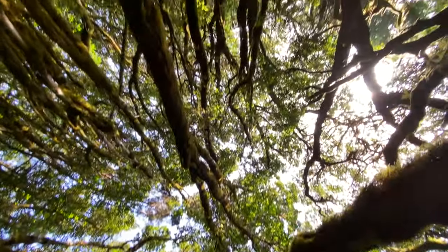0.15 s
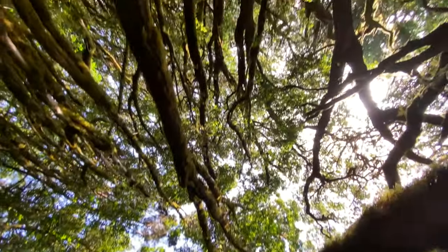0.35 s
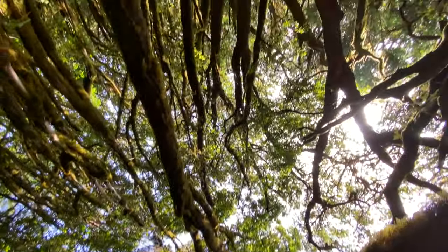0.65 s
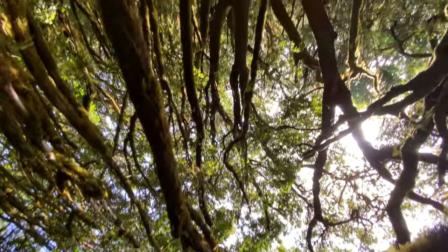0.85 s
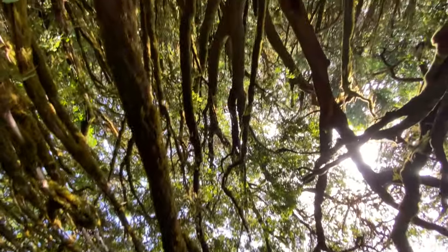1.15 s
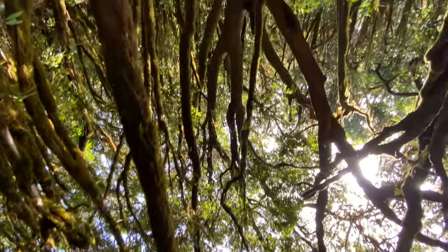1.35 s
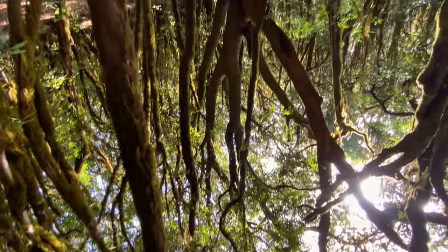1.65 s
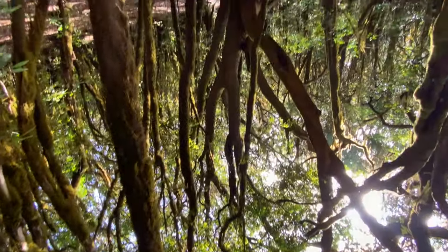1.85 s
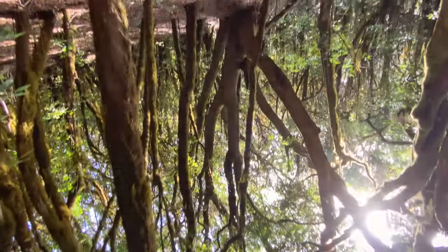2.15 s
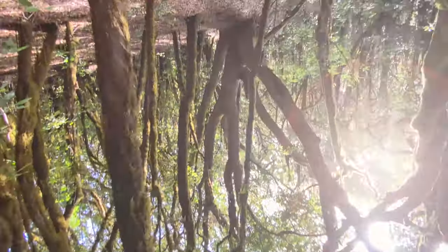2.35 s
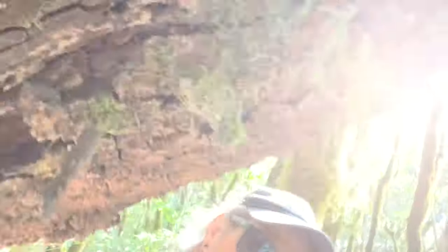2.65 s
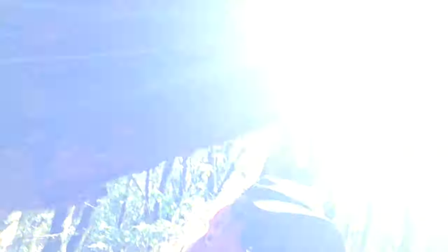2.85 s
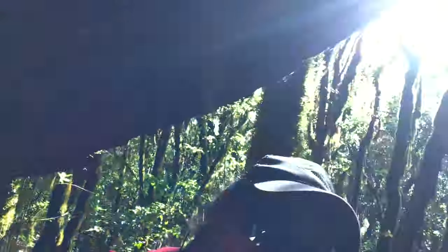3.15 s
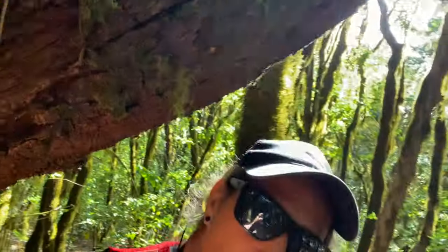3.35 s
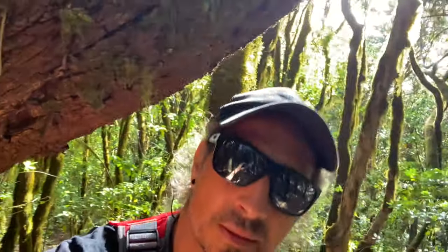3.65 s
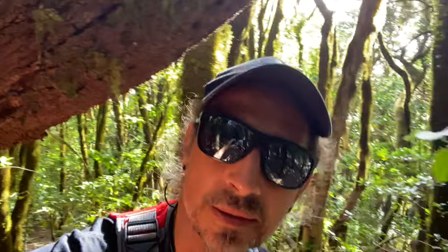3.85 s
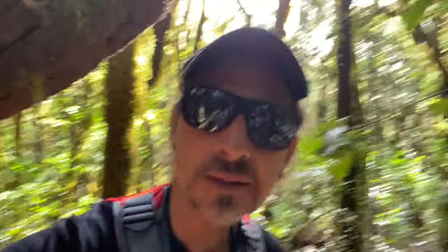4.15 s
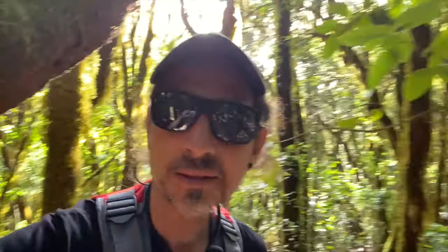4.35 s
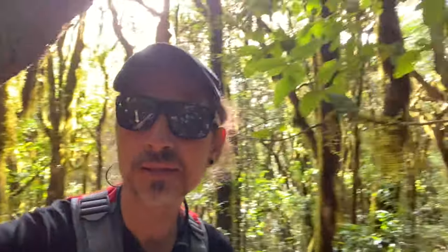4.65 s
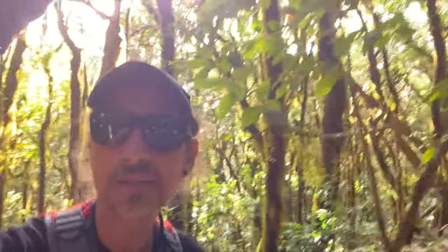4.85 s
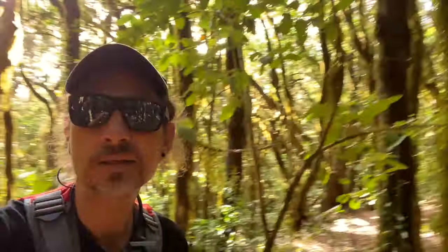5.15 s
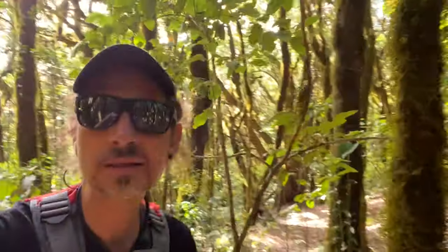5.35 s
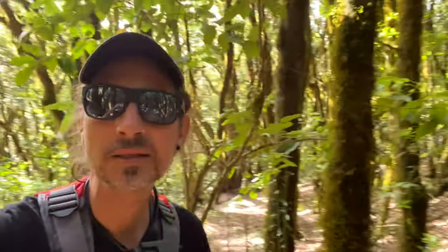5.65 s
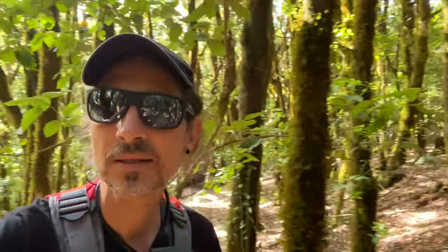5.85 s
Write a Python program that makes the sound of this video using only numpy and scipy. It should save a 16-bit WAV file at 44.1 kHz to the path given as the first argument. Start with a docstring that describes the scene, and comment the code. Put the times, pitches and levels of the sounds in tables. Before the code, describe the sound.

A very quiet forest with only faint air and a few tiny ticks for two seconds, then a walker steps into dry leaves. Irregular crunches, crinkling and sharp twig snaps follow, densest from about three to four seconds, with a firm dull thump near four. Sparser steps and rustling continue to the end. Close hand-held stereo microphones, dry outdoors, slight handling rumble.

```python
"""A still forest, two close microphones on a hand-held recorder: faint air, a few ticks, handling rumble.
Just before 2 s the walker first touches the litter; then leaves rustle and are trodden unevenly to the end.
Each press is a swarm of tiny noise bursts for breaking leaves, over a hiss where they only slide. Stalks and
twigs snap singly, as cracks with a short ring. Damped noise gives low thumps: soil under the foot, and wind or
handling on the microphones near 1.9 and 5.9 s. The legs and pack return a close echo; the foot's bearing sets
arrival time and level at each microphone."""
import sys
import numpy as np
from scipy import signal
from scipy.fft import rfft, irfft
from scipy.io import wavfile
from scipy.ndimage import uniform_filter1d, map_coordinates

SR = 44100
rng = np.random.default_rng(int(sys.argv[2]) if len(sys.argv) > 2 else 0)


def unload_audio(sound):
    """Save the sound as a 16-bit wav file, at the path given as the first command line argument."""
    columns = np.transpose(np.atleast_2d(sound))
    # keep every value between -1 and 1, then stretch to whole-number steps
    steps = np.round(np.clip(columns, -1, 1) * 32767)
    wavfile.write(sys.argv[1], SR, steps.astype(np.int16))


N = 264600
TIME = np.arange(N) / SR


def from_db(db):
    """Decibels to amplitude gain."""
    return np.exp(np.asarray(db) * (np.log(10) / 20))


def rms_one(x):
    """Scale to unit rms."""
    return x / np.sqrt(np.mean(x ** 2) + 1e-20)


def peak_one(x):
    """Scale to unit peak."""
    return x / (np.abs(x).max() + 1e-20)


def in_time(rows):
    """Join the rows of a table by straight lines: each column at every sample."""
    seconds, *columns = np.transpose(rows)
    return [np.interp(TIME, seconds, column) for column in columns]


def at_hz(points, hz):
    """Read a curve over frequency on a logarithmic axis."""
    point_hz, value = np.transpose(points)
    return np.interp(np.log(hz), np.log(point_hz), value)


def spectrum_hz():
    """Frequencies of a whole-length spectrum, with 1 Hz in place of zero."""
    return np.maximum(np.fft.rfftfreq(N, 1 / SR), 1)


def band(x, low, high, order=2):
    """Butterworth band-pass between two frequencies in Hz."""
    high = min(high, .47 * SR)
    low = min(low, high / 1.05)
    return signal.sosfilt(signal.butter(order, [low, high], "band", fs=SR, output="sos"), x)


def add(track, s, sound):
    """Mix a short sound in at s seconds."""
    i = int(np.clip(s * SR, 0, N - 1))
    track[..., i:i + sound.shape[-1]] += sound[..., :N - i]


def pair(white, alike):
    """Mix two noises into a left and right of given likeness, 0-1."""
    alike = np.clip(alike, 0, 1)
    shared = np.sqrt((1 + alike) / 2) * white[0]
    opposed = np.sqrt((1 - alike) / 2) * white[1]
    return shared + opposed * [[1], [-1]]


def drift(per_s):
    """Smooth chance with a spread of 1, changing about per_s times a second."""
    knots = rng.standard_normal(size=600)
    return rms_one(np.interp(TIME * per_s, np.arange(len(knots)), knots))


def delayed(x, ms):
    """Read a sound ms milliseconds late; ms may change with time."""
    return map_coordinates(x, [np.arange(N) - ms * SR / 1000], order=2, mode="nearest")


def air_noise(spectrum, alike):
    """Steady stereo noise of a given colour, rms 1."""
    white = pair(rng.standard_normal((2, N)), alike)
    return rms_one(irfft(rfft(white) * from_db(at_hz(spectrum, spectrum_hz())), N))


# Colour of the forest air around the recorder. Each row: frequency in Hz, relative density in dB per Hz.
FOREST_COLOUR = [(30, -25), (44, -15), (59, 5), (78, -12), (125, -11), (240, -15.5), (450, -24), (800, -28),
                 (1600, -25), (2800, -28), (4300, -25.5), (7600, -30.5), (8400, -24.5), (11500, -47),
                 (15000, -75)]
FOREST_DB = -60.2   # rms before the side-to-side tilt


def forest_air():
    """The quiet place itself: steady coloured noise, stronger at the right microphone."""
    return from_db(FOREST_DB) * air_noise(FOREST_COLOUR, alike=0.28) * from_db([[-1.8], [1.8]])


# Colour of the hand on the recorder. Each row: frequency in Hz, relative density in dB per Hz.
RUMBLE_COLOUR = [(20, -36), (36, -8), (50, -7), (75, -2.5), (120, -10), (250, -21), (1000, -28),
                 (8000, -100)]
# The hand shifts. Each row: time of greatest height in s, level in dB, half-length (power down to 1/e) in s.
HAND_SHIFTS = [(1.5, -64.5, .55), (1.93, -50.5, .05), (2.7, -61, .7), (3.03, -49.5, .075), (4.1, -60, .22),
               (4.87, -59.5, .08), (5.46, -50, .035), (5.95, -46.5, .055)]


def handling():
    """The hand shifts on the recorder: each time a bell-shaped swell of low rumble."""
    power = np.zeros(N)
    for s, db, half_s in HAND_SHIFTS:
        power += from_db(db) ** 2 * np.exp(-((TIME - s) / half_s) ** 2)
    return np.sqrt(power) * air_noise(RUMBLE_COLOUR, alike=0.69)


# Faint ticks and the first touches of the foot.
# Each row: start in s, peak in dB before the common lift, pitch in Hz, band half-width relative to pitch.
TICKS = [(.075, -48, 1990, 1), (.108, -42.5, 3800, 0.13), (.455, -51, 2000, .9), (.47, -46.5, 8200, .15),
         (.605, -46, 7900, 0.095), (0.829, -39.5, 8400, 0.062), (1.074, -32, 8360, 0.037),
         (1.096, -44, 8150, 0.1), (1.852, -44, 2380, 0.8), (1.876, -40.5, 1490, 1.2),
         (1.905, -43, 2200, .8), (1.9365, -30, 8700, 0.056), (1.938, -32, 2490, 1), (1.946, -38, 4400, .3),
         (1.976, -42, 8100, 0.093)]


def ticks(level_db, fade_s, tail_db, tail_s):
    """Small light ticks: short noise bursts with a weaker, longer scatter from the trunks."""
    out, t = np.zeros((2, N)), TIME[:SR // 8]
    fade = np.exp(-t / fade_s) + from_db(tail_db) * np.exp(-t / tail_s)
    for s, db, hz, width in TICKS:
        burst = pair(rng.standard_normal((2, len(t))), 0.26) * fade
        tick = peak_one(band(burst, hz / (1 + width), hz * (1 + width)))
        add(out, s, from_db(db + level_db) * tick)
    return out


# Low thumps: soil under the foot, and wind or handling on the microphones near 1.9 and 5.9 s.
# Each row: start in s, peak in dB before the bearing, pitch in Hz, 60 dB decay of the push in s.
THUMPS = [(1.877, -41, 130, 0.085), (1.915, -40, 50, 0.2), (2.935, -30.5, 338, .06),
          (2.995, -35, 232, 0.096), (3.908, -24, 700, 0.036), (3.926, -17.5, 735, 0.027),
          (3.928, -22.5, 375, 0.04), (4.02, -22.5, 800, .16), (4.185, -39, 244, 0.038),
          (4.29, -44, 139, 0.091), (5.875, -34.5, 51, 0.37)]


def thumps(width):
    """A push on soft ground or on the microphones: a dull, quickly damped burst of noise around one pitch."""
    out, t = np.zeros(N), TIME[:SR // 4]
    for s, db, hz, t60 in THUMPS:
        push = rng.standard_normal(len(t)) * from_db(-60 * t / t60)
        add(out, s, from_db(db) * peak_one(band(push, hz / (1 + width), hz * (1 + width))))
    return out


def press_envelope(s, attack_s, hold_s, release_s):
    """The foot loads the leaves, stays, and they settle."""
    t = TIME - s
    settling = np.maximum(t - attack_s - hold_s, 0)
    return np.clip(t / attack_s, 0, 1) * from_db(-20 * settling / release_s)


# A heel or sole presses or drags through the leaves. Each row: start in s, attack in s, hold in s,
# release to -20 dB in s, relative crunch in dB, relative weight on the soil in dB,
# crispness against crunch in dB, share that is fracture rather than sliding 0-1.
PRESSES = [(2.525, .02, .015, .1, -28, 2, -1, .5), (2.59, .015, .04, .08, -34, 2, -6, .3),
           (2.806, .018, .09, .15, -23.8, -5, -.5, .3), (2.85, .04, .06, .11, -27.5, 8, -8, .25),
           (2.975, .015, .025, .16, -26.5, 6, 1.5, .5), (3.1, .05, .055, .06, -32, 8.5, 1, .7),
           (3.885, .018, .02, .14, -19.7, 0.5, .5, .6), (3.995, .015, .03, .22, -26, 6, 3, .75),
           (4.06, .015, .012, .07, -30, -2, 3, .7), (4.804, .008, .016, .19, -23, -3, -3, .55),
           (5.22, .05, .08, .13, -30.8, -1.5, -3.5, .02), (5.838, .025, .045, .12, -24.5, -6, 0, .5),
           (5.975, .015, .025, .12, -29, -7, -1, .5)]
PRESS_SOIL_DB, PRESS_CRUMPLE_DB = -18, -11   # pressing and crumpling against crunch, at zero weight
CRUMPLE_PER_WEIGHT = .55   # share of the weight's dB that reaches the crumpling
# Litter that keeps rustling as the walker's weight shifts.
# Each row: time in s, relative crunch in dB, crispness against crunch in dB.
RUSTLE = [(2.0, -67, 2), (2.08, -54, 5), (2.19, -57, 4), (2.36, -38, 5.5), (2.66, -39, 0), (2.79, -49, -1),
          (3.18, -29.5, 2), (3.55, -32.5, 6), (3.86, -40, 8.5), (4.17, -37.5, 0), (4.28, -43, 2),
          (4.78, -43, 3), (5.02, -36, 2), (5.2, -38.5, 2), (5.45, -40.5, -4), (5.58, -40, 0),
          (5.72, -46.5, 2), (6.0, -37, 0)]
RUSTLE_MID_DB, CRISP_THINS = -37.3, .7   # a middling rustle; a crisp one presses less (dB per dB)
RUSTLE_SOIL_DB, SOIL_FOLLOWS = -53, .42   # pressing under a middling rustle; share of its swing
RUSTLE_CRUMPLE_DB, CRUMPLE_FOLLOWS = -44.5, .68   # the same for the crumpling
# How dry the litter underfoot is. Each row: time in s, share of the rustle that is fracture 0-1.
DRYNESS = [(2.2, .75), (2.7, .58), (3.3, .78), (3.8, .88), (4.4, .7), (5.1, .38), (5.7, .65)]


def tread():
    """Sum presses and rustle: dB of pressing, crumpling, crunch, crispness, and the share of fracture."""
    rustle_db, crisp_db = in_time(RUSTLE)
    swing = rustle_db - RUSTLE_MID_DB - CRISP_THINS * crisp_db
    soil_db = RUSTLE_SOIL_DB + SOIL_FOLLOWS * swing
    crumple_db = RUSTLE_CRUMPLE_DB + CRUMPLE_FOLLOWS * swing
    power = from_db([soil_db, crumple_db, rustle_db, rustle_db + crisp_db]) ** 2
    breaking = in_time(DRYNESS)[0] * power[2]
    for s, attack_s, hold_s, release_s, db, weight_db, crisp_db, brittle in PRESSES:
        soil_db = PRESS_SOIL_DB + weight_db
        crumple_db = PRESS_CRUMPLE_DB + CRUMPLE_PER_WEIGHT * weight_db
        gains = from_db(db) * from_db([soil_db, crumple_db, 0, crisp_db])
        press = np.outer(gains, press_envelope(s, attack_s, hold_s, release_s)) ** 2
        power = power + press
        breaking = breaking + brittle * press[2]
    return 10 * np.log10(power), np.clip(breaking / power[2], 0, .97)


STALKS_PER_S = 10   # stalks that could break, before the share of fracture decides
STALK_OVER_CRUNCH_DB, STALK_SPREAD_DB = 10, 2.0
THIN_STALK_HZ, THIN_SHARE = 9000, .6   # thin ones ring high, the others at the litter's pitch
STALK_CRACK_DB = -3   # broad crack against the ring


def lesser_stalks(crunch_db, brittle):
    """Random small snaps that follow the crunch and are rare while the foot slides: rows like SNAPS."""
    rows, start = [], RUSTLE[0][0]
    chances, spreads = rng.random((200, 3)), rng.standard_normal((200, 2))
    for k, (when, breaks, kind) in enumerate(chances):
        size, pitch = spreads[k]
        s = start + (k + when) / STALKS_PER_S
        i = int(s * SR)
        if i < N and breaks < brittle[i]:
            hz = THIN_STALK_HZ if kind < THIN_SHARE else np.interp(s, *np.transpose(RING))
            db = crunch_db[i] + STALK_OVER_CRUNCH_DB + STALK_SPREAD_DB * size
            rows.append((s, db, hz * np.exp(.1 * pitch), STALK_CRACK_DB))
    return rows


# The loudest stalks and twigs breaking close to the microphones. Each row: start in s,
# peak in dB before the common lift and bearing, pitch in Hz, broad crack against the ring in dB.
SNAPS = [(2.0743, -24.5, 8730, 0.5), (2.2415, -23, 9700, -12), (2.3282, -20, 7600, 4),
         (2.378, -18.5, 9600, 3), (2.4062, -17, 10900, 5), (2.4513, -14.5, 4150, 4),
         (2.5454, -11, 3930, -3), (2.7184, -22, 1950, -1), (2.9307, -11, 3500, -9),
         (2.9444, -13, 3930, -12), (3.044, -14, 3330, -10), (3.1635, -10.5, 3330, -6),
         (3.2052, -13, 3530, 0), (3.211, -11, 3700, -3), (3.269, -6, 4700, -5), (3.2769, -10, 8460, -10),
         (3.3438, -12, 3610, -15), (3.3932, -12, 9700, -20), (3.4535, -14, 11100, -10),
         (3.464, -10, 10500, -9), (3.4944, -6.5, 8300, -18), (3.4977, -9, 8600, -20),
         (3.5403, -12, 10800, -19), (3.642, -8.5, 12000, -15), (3.6961, -11.5, 3330, -4),
         (3.7369, -9.5, 8400, -5), (3.7735, -8, 3730, -6), (3.865, -14.5, 8940, -14.5),
         (3.9482, -7, 8600, 10), (4.028, -6, 8560, 4), (4.079, -9, 9000, 8), (4.1812, -19, 1993, 7),
         (4.2105, -21, 1280, 8), (4.338, -17.5, 7640, -20), (4.406, -10.5, 12400, 4),
         (4.5594, -17, 11200, 10), (4.6447, -18, 2140, -7), (4.6874, -21.5, 1420, -12),
         (4.847, -6, 5260, -6), (4.9015, -17, 5500, -6), (4.9182, -15, 9780, 3), (4.981, -11, 2700, 3),
         (5.5474, -17.5, 7460, 5), (5.656, -21.5, 8150, 4), (5.7677, -23, 1600, -3),
         (5.8585, -10, 2630, 15), (5.9333, -10.5, 10800, 9)]


def snaps(rows, level_db, crack_s, ring_s, width_hz, scatter_db, scatter_s):
    """A stalk breaks with a broad crack and a brief ring, and shakes the leaves that touch it."""
    out, t = np.zeros((2, N)), TIME[:SR // 25]
    for s, db, hz, crack_db in rows:
        white = rng.standard_normal((4, len(t)))
        tearing = np.sign(white[:2])   # fibres give way in quick, equal jerks
        crack = peak_one(band(tearing[0] * np.exp(-t / crack_s), 1270, 15500))
        low = np.hypot(hz, width_hz / 2) - width_hz / 2
        ring = peak_one(band(tearing[1] * np.exp(-t / ring_s), low, low + width_hz, order=1))
        snap = peak_one(ring + from_db(crack_db) * crack)
        shaken = rms_one(band(pair(white[2:], 0.54), hz / 2, hz * 2)) * np.exp(-t / scatter_s)
        add(out, s, from_db(db + level_db) * (snap + from_db(scatter_db) * shaken))
    return out


def fractures(per_s, spread_db, clump_db):
    """Times and sizes of tiny leaf breaks: they come in clumps, most small, a few large."""
    clumps = rms_one(uniform_filter1d(rng.standard_normal(N), SR // 120))
    chance, sizes = rng.random(N), rng.exponential(1, N)
    at = np.flatnonzero(chance < per_s * from_db(clump_db * clumps) / SR)
    return at, from_db(spread_db * np.minimum(sizes[at], 3.3))


# Centres in Hz of the four regions of leaf sound: pressing, crumpling, crunch, crispness.
TREAD_HZ = (450, 1400, 3600, 9000)
# Colour of the leaves. Each row: frequency in Hz, relative density in dB per Hz.
LEAF_COLOUR = [(100, -15), (200, -9.5), (400, -11), (800, -6.5), (1400, -1), (2000, -1.5), (3000, 0.5),
               (4500, 1.8), (6500, 1), (8500, 1), (12500, 2.2), (16000, -3.5)]
# How alike the leaves sound at the two microphones. Each row: frequency in Hz, likeness 0-1.
LIKENESS = [(100, 0.85), (1000, 0.83), (3000, 0.62), (5000, 0.12), (6000, .1), (7500, .7), (9000, .98)]


def litter(tread_db, brittle, level_db, body_db, crunch_db, colour_db, fade_s, cycles, patchy_db):
    """Every break is a brief burst with a colour of its own, over the hiss of sliding leaves."""
    at, sizes = fractures(per_s=750, spread_db=3.5, clump_db=3.5)
    edges = np.geomspace(110, 16500, 17)
    centres = np.sqrt(edges[1:] * edges[:-1])
    power = from_db(at_hz(LEAF_COLOUR, centres)) ** 2 * np.diff(edges)
    zone = np.digitize(centres, [900, 2200, 6000])
    # each region of the leaf spectrum swells with its own part of the tread
    swell = np.array([db - 10 * np.log10(power[zone == k].sum()) for k, db in enumerate(tread_db)])
    swell[:2] += body_db
    swell[2] += crunch_db
    white, out = rng.standard_normal((2, 2, N)), np.zeros((2, N))
    colours = rng.standard_normal(size=(20000, len(centres) + 1))[:len(at)]
    for k, hz in enumerate(centres):
        energy = np.zeros(N)
        own_colour = (colours[:, k] + colours[:, k + 1]) / 2   # neighbouring bands are related
        energy[at] = (sizes * from_db(colour_db * own_colour)) ** 2
        keep = np.exp(-2 / (SR * (fade_s + cycles / hz)))   # low notes ring longer
        energy = signal.lfilter([1 - keep], [1, -keep], energy + 1e-12)
        energy = uniform_filter1d(energy, size=8)   # softens the start of each burst
        energy /= uniform_filter1d(energy, SR // 25) + 1e-9   # the foot's weight sets the total
        grain = np.sqrt(brittle * np.abs(energy) + 1 - brittle)
        grainy = pair(white[k % 2], at_hz(LIKENESS, hz)) * grain
        sound = rms_one(band(grainy, edges[k], edges[k + 1]))
        weights = np.array([np.interp(np.log(hz), np.log(TREAD_HZ), row) for row in np.eye(len(TREAD_HZ))])
        band_db = weights @ swell + level_db + patchy_db * drift(per_s=45)
        out += sound * (np.sqrt(power[k]) * from_db(band_db))
    return out * np.clip((TIME - RUSTLE[0][0]) / 0.023, 0, 1)


# The pitch at which the litter rings sinks along the path. Each row: time in s, pitch in Hz.
RING = [(2.5, 4300), (2.9, 4050), (3.1, 3750), (3.75, 3650), (4.05, 3200), (5.3, 3200)]


def leaf_ring(x, brittle, width_hz, ring_db, sliding_db):
    """Curled leaves favour one pitch, with a hollow just above; a sliding sole makes it sing out."""
    centre, r = in_time(RING)[0], np.exp(-np.pi * width_hz / SR)
    out, state = np.zeros_like(x), np.zeros((2, 2))
    for i in range(0, N, 256):
        block = slice(i, i + 256)
        poles = [1, -2 * r * np.cos(2 * np.pi * centre[i] / SR), r * r]
        out[:, block], state = signal.lfilter([0, sum(poles), 0], poles, x[:, block], zi=state)
    return x + from_db(ring_db + sliding_db * (1 - brittle) ** 4) * out


def off_the_body(x, echo_db, lag_ms, sway_ms):
    """The walker's legs and pack throw back a close echo whose delay wanders irregularly."""
    ms = np.abs(lag_ms + sway_ms * drift(per_s=8))
    return x + from_db(echo_db) * np.array([delayed(side, ms) for side in x])


# Where the foot falls, seen from the recorder.
# Each row: time in s, lead of the right microphone in ms, left minus right in dB.
BEARING = [(2.7, -0.044, 6.5), (2.85, 0.025, 5), (3.7, 0.041, 2.5), (3.9, .13, 2.3), (4.95, 0.12, 3.2),
           (5.25, 0.01, 2.3), (5.6, 0.01, 2), (5.85, .13, 2.6)]
# Phase by which the left microphone port leads the right. Each row: frequency in Hz, phase in radians.
PORT_PHASE = [(150, 0), (600, .7), (1500, .85), (2750, .55), (3700, 0), (4900, -1)]
BLEND_HZ = 6400   # above this the bearing and port phase give way


def from_ground(x):
    """The foot's bearing gives the two microphones different arrival times and levels."""
    lead_ms, pan_db = in_time(BEARING)
    hz = spectrum_hz()
    right = irfft(rfft(delayed(x[1], -lead_ms)) * np.exp(-1j * at_hz(PORT_PHASE, hz)), N)
    spaced = np.array([x[0] * from_db(pan_db / 2), right * from_db(-pan_db / 2)])
    # the high treble sits in the centre
    treble = 1 / (1 + (BLEND_HZ / hz) ** 12)
    return irfft(from_db(1.0) * rfft(spaced) * (1 - treble) + rfft(x) * treble, N)


def scene():
    """Steps in the leaves over the quiet forest air."""
    forest, hand = forest_air(), handling()
    small = ticks(level_db=1.5, fade_s=0.0016, tail_db=-15, tail_s=0.027)
    low_thumps = thumps(width=0.36)
    tread_db, brittle = tread()
    stalks = SNAPS + lesser_stalks(tread_db[2], brittle)
    twigs = snaps(stalks, level_db=3.5, crack_s=0.00077, ring_s=.001, width_hz=920,
                  scatter_db=-19, scatter_s=0.007)
    crushed = litter(tread_db, brittle, level_db=0.6, body_db=-1.6, crunch_db=0, colour_db=5.0,
                     fade_s=0.00047, cycles=1.0, patchy_db=1.5)
    ringing = leaf_ring(crushed, brittle, width_hz=770, ring_db=-16, sliding_db=8)
    leaves = off_the_body(ringing, echo_db=-12, lag_ms=1.9, sway_ms=0.403)
    return from_ground(leaves + twigs + low_thumps) + small + hand + forest


TURN_HZ, TURN_WIDTH_HZ = 12700, 1100   # where the channels turn out of phase
LOW_CUT_HZ, CUTOFF_HZ = 37, 15900


def record(dry):
    """Turn the topmost treble out of phase, so it spreads wide; cut deepest bass, tallest peaks and top."""
    hz = np.fft.rfftfreq(N, 1 / SR)
    turn = np.pi / 2 * (1 + np.tanh((hz - TURN_HZ) / TURN_WIDTH_HZ))
    wide = np.array([dry[0], irfft(rfft(dry[1]) * np.exp(-1j * turn), N)])
    bass_cut = signal.sosfilt(signal.butter(6, LOW_CUT_HZ, "high", fs=SR, output="sos"), wide)
    clipped = np.clip(bass_cut, -.8, .8)
    return signal.sosfilt(signal.ellip(10, .1, 80, CUTOFF_HZ, fs=SR, output="sos"), clipped)


dry = scene()
out = record(dry)
unload_audio(out)
```